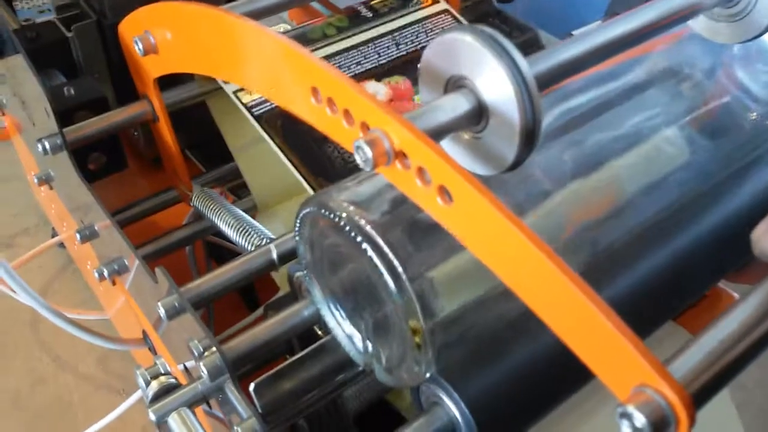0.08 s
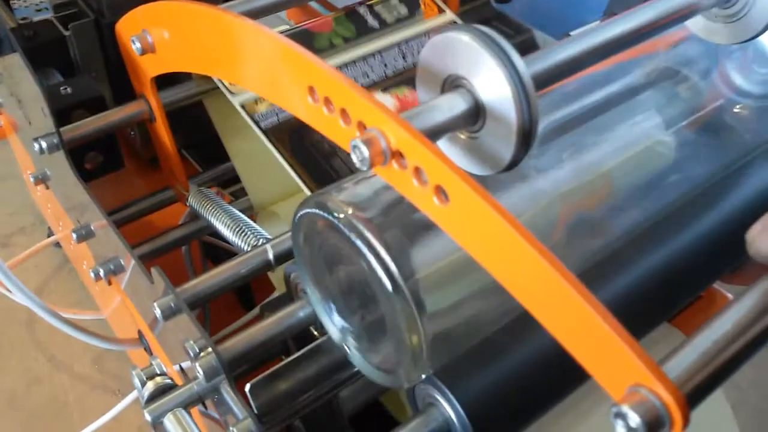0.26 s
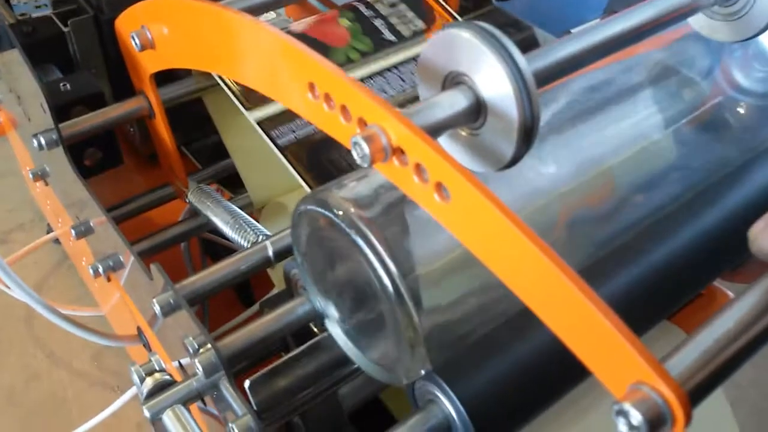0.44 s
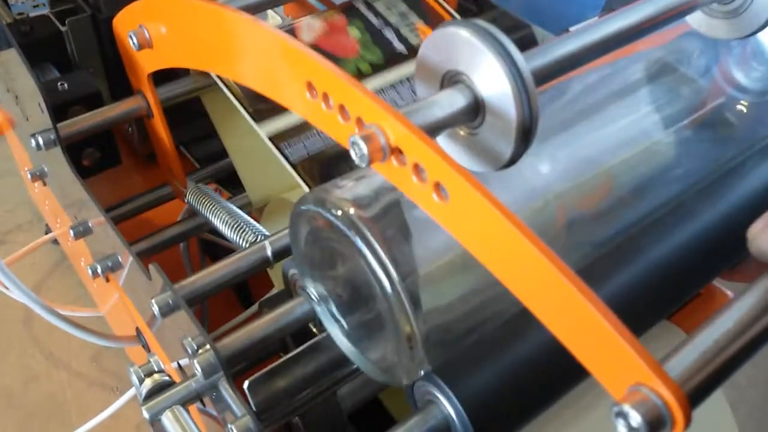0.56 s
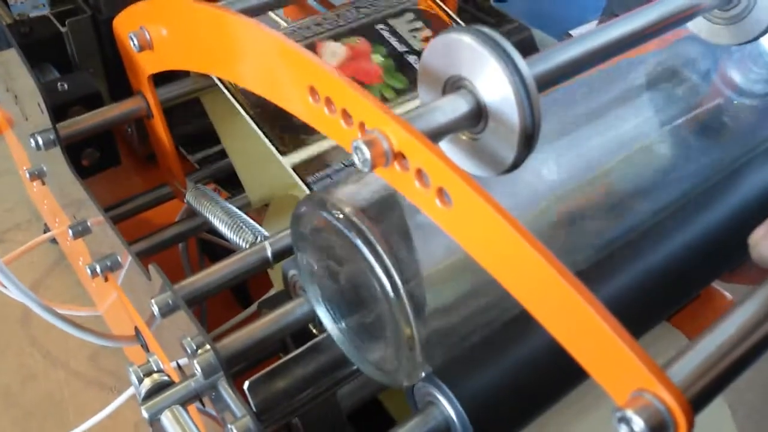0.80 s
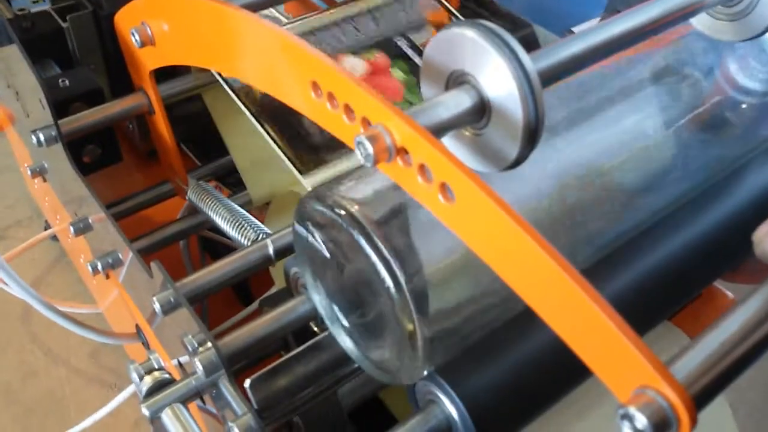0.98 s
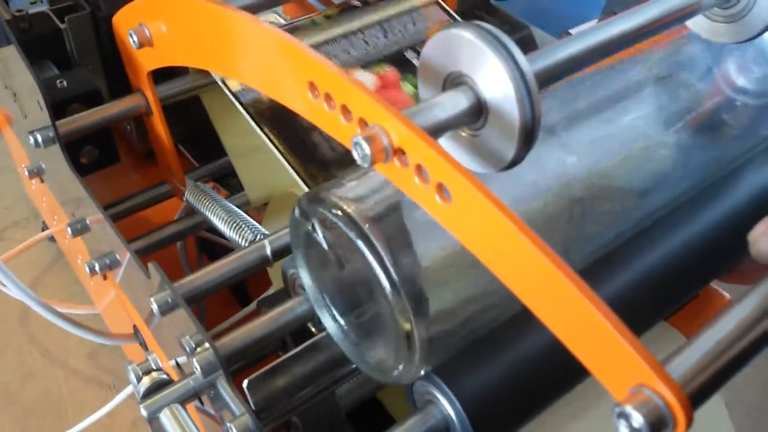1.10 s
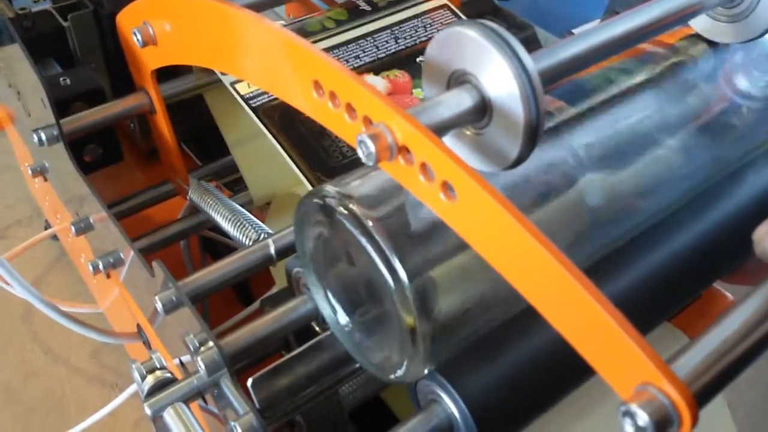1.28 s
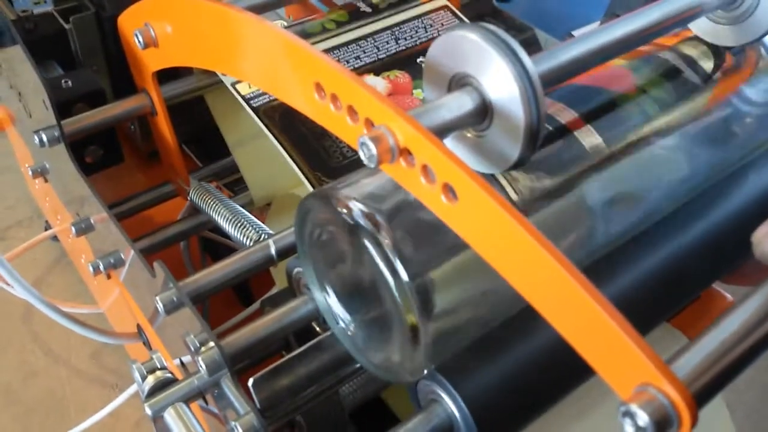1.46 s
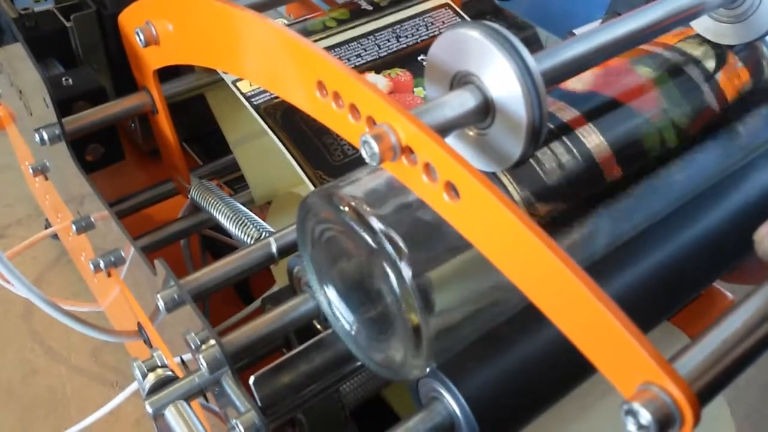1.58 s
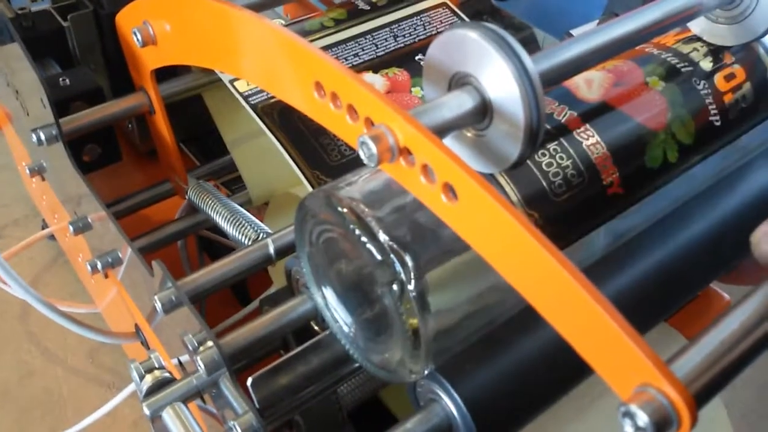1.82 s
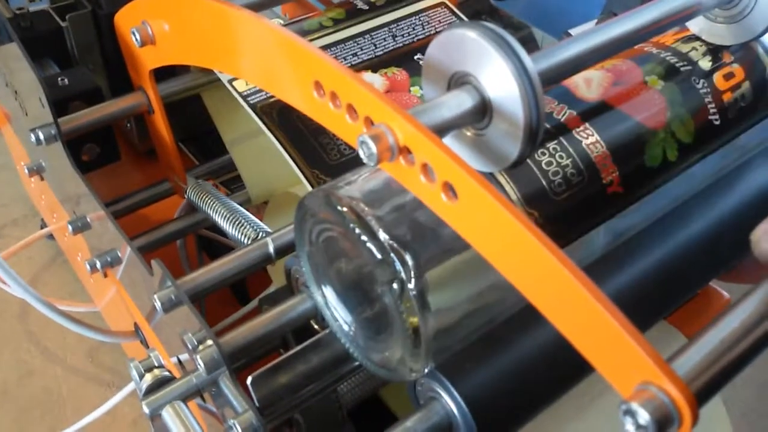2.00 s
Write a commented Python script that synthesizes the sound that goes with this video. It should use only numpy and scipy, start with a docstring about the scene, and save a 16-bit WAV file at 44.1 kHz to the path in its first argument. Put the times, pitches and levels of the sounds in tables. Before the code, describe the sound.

A small labelling machine starts with a thump, its motor humming and steel parts rattling fast. A paper label crackles onto a glass bottle as rubber rollers rumble and whine. It stops with a thud and click in a quiet room.

```python
"""A faint tick, then a thump: a bench labelling machine starts up in a quiet room.
Its feed motor hums and its gears grind for a second, while the drive rattles the steel parts
about 36 times a second. The paper label crackles and slaps on to the turning glass bottle,
which rings hollow as the rubber rollers rumble, hiss and whine under it.
The machine stops with a thud and a click."""
import sys
import numpy as np
from scipy import signal
from scipy.fft import rfft, irfft
from scipy.io import wavfile
from scipy.ndimage import uniform_filter1d

SR = 44100
rng = np.random.default_rng(int(sys.argv[2]) if len(sys.argv) > 2 else 0)


def transcribe(signal):
    """Save signal, clipped to [-1, 1], as a 16-bit WAV file at the path in sys.argv[1]."""
    frames = np.atleast_2d(signal).T
    limited = np.clip(frames, -1, 1)
    pcm = np.round(limited * 32767).astype(np.int16)
    wavfile.write(sys.argv[1], SR, pcm)


N = 90404
T = np.arange(N) / SR
FREQS = np.arange(N // 2 + 1) * SR / N
FEED_ON_S, FEED_OFF_S = 0.215, 1.25


def from_db(db):
    """Decibels to gain."""
    return 10 ** (np.asarray(db) / 20)

def rms_one(x):
    """Scale to rms 1."""
    return x / np.sqrt(np.mean(x ** 2) + 1e-20)

def fader(curve):
    """Gain along a (time [s], level [dB]) curve, silent outside it."""
    return from_db(np.interp(T, *np.transpose(curve), left=-140, right=-140))

def cycles(curve):
    """Cycles completed along a (time [s], rate [Hz]) curve."""
    return np.cumsum(np.interp(T, *np.transpose(curve))) / SR

def swell(at_s, rise_s, decay_s):
    """Envelope that rises to 1 at at_s and dies away."""
    return np.exp(-np.minimum(np.where(T < at_s, (at_s - T) / rise_s, (T - at_s) / decay_s), 20))

def feed_gate(rise_s, run_down_s=0.013):
    """Envelope that ramps up, holds while the feed runs and dies away."""
    ramp = np.clip((T - FEED_ON_S) / rise_s, 0, 1)
    return ramp * np.exp(-np.maximum(T - FEED_OFF_S, 0) / run_down_s)

def equalise(x, spectrum):
    """Shape noise with an EQ curve, rolled off below its first point; rms 1."""
    hz, db = np.transpose(spectrum)
    freqs = np.maximum(FREQS, 1)
    low_cut = np.minimum(freqs / hz[0], 1) ** 2
    gain = from_db(np.interp(np.log(freqs), np.log(hz), db))
    return rms_one(irfft(rfft(x) * low_cut * gain, N))

def butterworth(x, hz, kind, order=2):
    """Low-, high- or band-pass filter."""
    return signal.sosfilt(signal.butter(order, hz, kind, fs=SR, output="sos"), x + 1e-18)

def resonance(x, hz, width_hz):
    """Two-pole resonator with gain 1 at its peak."""
    r = np.exp(-np.pi * width_hz / SR)
    feedback = [1, -2 * r * np.cos(2 * np.pi * hz / SR), r * r]
    return signal.lfilter(np.array([1, 0, -1]) * (1 - r * r) / 2, feedback, x)

def drift(rate_hz):
    """Random wobble, mostly slower than rate_hz; rms 1."""
    spectrum = rfft(rng.standard_normal(N)) * (FREQS > 0)
    return rms_one(irfft(spectrum / (1 + (FREQS / rate_hz) ** 2), N))

def grains(per_s, spread_db):
    """Tiny contacts at random times, their sizes scattered by spread_db; rms 1."""
    sizes = from_db(spread_db * np.minimum(rng.exponential(1, N), 3)) * rng.choice([-1, 1], N)
    return rms_one(sizes * (rng.random(N) < per_s / SR))

def struck_mode(at_s, db, hz, t60_s, rise_s=0.0035):
    """A decaying sine with a soft attack."""
    age = np.maximum(T - at_s, 0)
    attack = 1 - np.exp(-age / rise_s)
    return from_db(db - 60 * age / t60_s) * attack * np.sin(2 * np.pi * hz * age)


# Room tone EQ: (frequency [Hz], gain [dB])
ROOM_TONE_EQ = [(15, -22.5), (25, -9), (33, 0.5), (271, -6.5), (309, 0.5), (637, -6.5), (748, -5),
                (1280, -10), (10000, -17), (12100, -12.5), (15000, -14)]
def room_tone(level_db=-71):
    """A faint, steady bed of dark noise."""
    return from_db(level_db) * equalise(rng.standard_normal(N), ROOM_TONE_EQ)

def reverb(send, t60_s=0.54, predelay_s=0.006, wet_db=-14.5, bass_db=-13):
    """The room's reflections blur into a diffuse tail, fuller in the bass."""
    tail = rng.standard_normal(N) * from_db(-60 * T / t60_s) * (T > predelay_s)
    wet = signal.fftconvolve(send, tail / np.sqrt(np.sum(tail ** 2)))[:N]
    bass = butterworth(wet, hz=150, kind="low", order=1)
    return from_db(wet_db) * wet + from_db(bass_db) * bass

# Metal ticks: (time [s], level [dB], low cut [Hz], high cut [Hz], decay [s])
METAL_CLICKS = [(0.142, -56.5, 2600, 12000, 0.014), (.155, -67, 2350, 13000, 0.1),
                (0.205, -44, 500, 5770, .02), (1.538, -27, 3500, 4200, 0.028),
                (1.7732, -26, 1220, 3540, 0.001), (2.001, -65.5, 1400, 2590, .015)]
def metal_clicks():
    """Small metal parts snap and clink, each a sharp burst of band-passed noise."""
    track = np.zeros(N)
    for at_s, db, low_hz, high_hz, decay_s in METAL_CLICKS:
        burst = rng.standard_normal(N) * (T >= at_s) * swell(at_s, decay_s, decay_s)
        makeup_gain = np.sqrt(SR / 2 / (high_hz - low_hz))
        track += from_db(db) * makeup_gain * butterworth(burst, [low_hz, high_hz], "band")
    return track

# Tempo of the drive's bursts: (time [s], rate [Hz])
BURST_RATE = [(.21, 34.6), (.28, 34.3), (.34, 41), (.39, 39.8), (.45, 36.8), (.9, 35.7), (.97, 36.5),
              (1.08, 39.2), (1.14, 39.7), (1.3, 37.4)]
def burst_count(onset_s=0.6845):
    """Running count of the drive's bursts: whole numbers are onsets, one of them at onset_s."""
    count = cycles(BURST_RATE)
    return count - np.interp(onset_s, T, count)

def burst_pulse(rise=0.052, hold=0.41, fall=0.45, depth_db=10):
    """Each burst snaps on, holds and fades, in shares of its period; rms 1."""
    shape = np.interp(burst_count() % 1, np.cumsum([0, rise, hold, fall]), [0, 1, 1, 0])
    return rms_one(from_db(depth_db * shape))

# Gear noise EQ: (frequency [Hz], gain [dB])
GEAR_EQ = [(40, -34.5), (70, -20), (110, -7.5), (200, 0.5), (250, 0), (300, 5.5), (370, -14), (560, -6),
           (900, -11), (1200, -3.5), (1340, -10.5), (1600, -5), (2200, -10.5), (3000, -3), (5500, -15.5),
           (8000, -19.5), (10000, -24.5), (12000, -48), (15000, -61.5)]
def gears(level_db=-30.5, flutter_db=1.3, pulse_follow=0.072):
    """The running gears make a grainy grind that swells a little with each burst."""
    grind = equalise(grains(per_s=13000, spread_db=3), GEAR_EQ)
    gain = from_db(level_db + flutter_db * drift(31))
    return grind * gain * burst_pulse() ** pulse_follow * feed_gate(rise_s=0.005)

# Feed motor pitch: (time [s], pitch [Hz])
MOTOR_PITCH = [(0.27, 452.2), (0.394, 449.6), (0.426, 450.7), (1.004, 450.4), (1.18, 448.3), (1.22, 457)]
# Its partials: (pitch ratio, start level [dB], end level [dB], waver [dB])
MOTOR_PARTIALS = [(0.3329, -36.5, -44.5, -0.5), (.5, -33.5, -30, 0.5), (1, -32, -26, 2)]
def motor_hum():
    """Three wavering tones: the upper two grow as the label is drawn out, the lowest fades."""
    phase = 2 * np.pi * cycles(MOTOR_PITCH)
    hum = np.zeros(N)
    for ratio, start_db, end_db, waver_db in MOTOR_PARTIALS:
        ramp_db = np.interp(T, [FEED_ON_S, FEED_OFF_S], [start_db, end_db])
        hum += from_db(ramp_db + waver_db * drift(36)) * np.sin(ratio * phase)
    return hum * feed_gate(rise_s=0.12)

# Roller faders, the whine with one per harmonic: (time [s], level [dB])
RUMBLE_FADER = [(1.248, -71), (1.265, -25.5), (1.32, -30.5), (1.37, -27), (1.44, -35), (1.49, -23.5),
                (1.53, -27), (1.59, -32.5), (1.64, -40.5), (1.75, -48), (1.8, -53.5), (1.86, -84)]
HISS_FADER = [(1.26, -88), (1.295, -34.5), (1.33, -41.5), (1.4, -40), (1.55, -40.5), (1.62, -42.5),
              (1.755, -43.5), (1.775, -66), (1.82, -86)]
WHINE_FADERS = [
    [(1.3, -60), (1.36, -38), (1.44, -44), (1.49, -32), (1.58, -29), (1.65, -46), (1.79, -54), (1.83, -85)],
    [(1.3, -60), (1.36, -36), (1.435, -41), (1.47, -24), (1.495, -28), (1.525, -25), (1.58, -36),
     (1.64, -49), (1.71, -52), (1.78, -75)],
    [(1.33, -60), (1.4, -35), (1.435, -42), (1.468, -29), (1.505, -36), (1.542, -24), (1.585, -29),
     (1.61, -43), (1.7, -48), (1.79, -70)],
]
DRONE_FADER = [(1.24, -55), (1.27, -42), (1.34, -47), (1.4, -29.5), (1.49, -50), (1.57, -36), (1.64, -56),
               (1.75, -48.5), (1.8, -69.5)]
# Bottle rumble and rubber hiss EQs: (frequency [Hz], gain [dB])
RUMBLE_EQ = [(30, -29), (62, -24), (94, -4.5), (130, -0.5), (200, -4), (320, -6), (430, -10), (640, -7),
             (900, -14), (1700, -9.5), (2300, -16), (3600, -15), (5000, -22.5), (8000, -31), (14000, -77.5)]
HISS_EQ = [(1180, -31), (2000, -28.5), (3860, -27), (4530, 5), (7200, -9.5), (9110, -3), (11000, -17.5),
           (14000, -14.5), (15000, -34.5)]
def rollers(whine_hz=578, pitch_waver=0.005, whine_flutter_db=1.5, drone_flutter_db=3):
    """The bottle rumbles on rubber rollers that hiss and whine over the low drone of their drive."""
    rumble = fader(RUMBLE_FADER) * equalise(grains(per_s=9000, spread_db=0), RUMBLE_EQ)
    hiss = fader(HISS_FADER) * equalise(grains(per_s=9000, spread_db=2), HISS_EQ)
    pitch_hz = whine_hz * (1 + pitch_waver * drift(50))
    phase = 2 * np.pi * np.cumsum(pitch_hz) / SR
    whine = sum(fader(curve) * from_db(whine_flutter_db * drift(80)) * np.sin(harmonic * phase)
                for harmonic, curve in enumerate(WHINE_FADERS, start=1))
    drone = fader(DRONE_FADER) * from_db(drone_flutter_db * drift(30)) * np.sin(phase / 6)
    return rumble + hiss + whine + drone

# Jolts to the frame: (time [s], level [dB], pitch [Hz], T60 [s])
FRAME_THUMPS = [(0.206, -26.5, 315, 0.61), (.2275, -15.5, 298, 0.078), (0.227, -23, 203, 0.17),
                (1.249, -22, 219, 0.26), (1.253, -35, 143, .09), (1.481, -18.5, 131, 0.18),
                (1.7574, -23, 208.7, 0.098), (1.7566, -20, 229, 0.097)]
def frame_thumps():
    """The frame rings low as the drives start and stop."""
    return sum(struck_mode(*thump) for thump in FRAME_THUMPS)

# Knocks on the bottle: (time [s], level [dB])
BOTTLE_KNOCKS = [(1.346, -28), (1.471, -24), (1.489, -28)]
# Its modes: (frequency [Hz], gain [dB], T60 [s])
BOTTLE_MODES = [(622.6, 6, 0.18), (687, 1.5, 0.3), (744, -0.5, .2)]
def bottle_knocks():
    """The label and the pressure wheel knock the bottle, which rings hollow."""
    return sum(struck_mode(at_s, knock_db + mode_db, hz, t60_s)
               for at_s, knock_db in BOTTLE_KNOCKS for hz, mode_db, t60_s in BOTTLE_MODES)

# Paper EQ: (frequency [Hz], gain [dB])
PAPER_EQ = [(200, -29.5), (450, -6), (650, -0.5), (900, -3.5), (1500, -0.5), (2300, -9.5), (4200, 2.5),
            (6000, -2), (9000, -10), (12500, -12), (15000, -28)]
# Paper hits: (time [s], level [dB], rise [s], decay [s], high cut [Hz])
PAPER_HITS = [(0.218, -31, 0.00066, 0.054, 1500), (1.187, -21.5, 0.0066, 0.0045, 14700),
              (1.344, -20.5, 0.0013, 0.013, 4670), (1.367, -18, 0.0046, 0.018, 11900),
              (1.479, -21.5, 0.0033, .022, 3850)]
def label():
    """The label web snaps taut, crackles and slaps on to the glass in short clumps of grains."""
    paper = equalise(grains(per_s=8000, spread_db=2.5), PAPER_EQ)
    track = np.zeros(N)
    for at_s, db, rise_s, decay_s, high_hz in PAPER_HITS:
        crackle = rms_one(butterworth(paper, high_hz, "low", order=1))
        track += from_db(db) * swell(at_s, rise_s, decay_s) * crackle
    return track

# Modes of the steel parts: (frequency [Hz], bandwidth [Hz], gain [dB])
STEEL_MODES = [(1531, 15, -5.5), (1668, 9, -3), (1720, 8.6, -8), (1900, 10, -12.5), (2652, 127, -7.5),
               (2940, 11, 3), (3144, 94, -10.5), (3310, 25, 3), (3502, 49, -9), (3880, 35, -6),
               (4294, 72, -7.5), (4580, 74, -1), (4830, 43, -2.5), (4988, 22, 2), (5295, 380, -13.5),
               (6720, 1000, -24)]
# Rattle fader, read once per burst: (time [s], level before trim [dB])
RATTLE_FADER = [(0.21, -45), (0.22, -35.5), (0.247, -23), (0.275, -51), (0.295, -43), (0.363, -29.5),
                (0.379, -25.5), (0.475, -26.5), (0.503, -25.5), (0.543, -32), (0.615, -26), (0.643, -34),
                (0.699, -22.5), (0.715, -31.5), (0.755, -31), (0.867, -21.5), (0.895, -27.5), (0.907, -22),
                (1.003, -27.5), (1.083, -25), (1.107, -38), (1.143, -33.5), (1.187, -25.5), (1.259, -26.5),
                (1.29, -37), (1.33, -56)][3:]
# Drive clacks: (time [s], level [dB], rise [s], decay [s])
LOAD_CLACKS = [(.2185, -30.5, 0.00054, 0.016), (0.2465, -18, 0.0082, 0.01), (1.253, -29, 0.0036, 0.017)]
def drive_rattle(trim_db=1, step_depth=0.12):
    """Steel parts chatter in bursts, and clack as the drive takes up and lets go of the load."""
    contacts = grains(per_s=9000, spread_db=-0.5)
    steel = sum((-1) ** k * from_db(db) * resonance(contacts, hz, width_hz)
                for k, (hz, width_hz, db) in enumerate(STEEL_MODES))
    steel /= np.sqrt(uniform_filter1d(steel ** 2, size=400) + 1e-12)  # an even drive keeps it level
    motor_steps = 1 + step_depth * np.cos(np.pi * cycles(MOTOR_PITCH))  # at half the motor's pitch
    count = burst_count()
    accents = np.interp(np.floor(count) + 0.15, count, fader(RATTLE_FADER))  # read just after onset
    chatter = from_db(trim_db) * accents * burst_pulse()
    clacks = sum(from_db(db) * swell(at_s, rise_s, decay_s) for at_s, db, rise_s, decay_s in LOAD_CLACKS)
    return rms_one(steel * motor_steps) * (chatter + clacks)


def scene():
    """Mono mix of the machine over room tone, with only a little hum sent to the reverb."""
    clatter = gears() + drive_rattle() + rollers() + label()
    clatter += frame_thumps() + bottle_knocks() + metal_clicks()
    hum = motor_hum()
    mix = room_tone() + clatter + hum + reverb(send=clatter + 0.17 * hum)
    return mix[None]

def record(dry):
    """A steep high cut at 15 kHz."""
    return signal.sosfilt(signal.ellip(10, 0.1, 80, 15000, fs=SR, output="sos"), dry)


dry = scene()
out = record(dry)
transcribe(out)
```